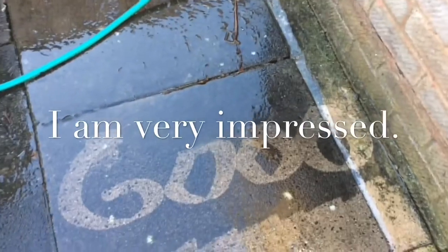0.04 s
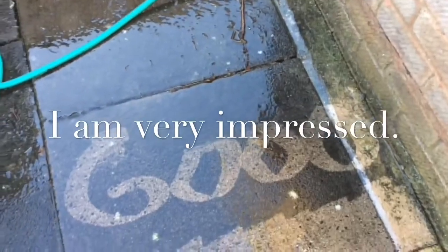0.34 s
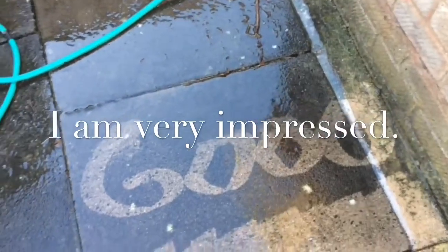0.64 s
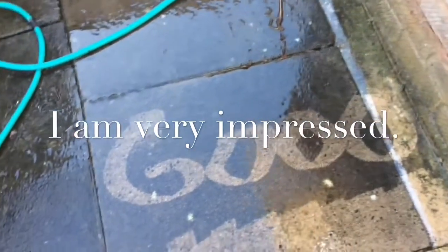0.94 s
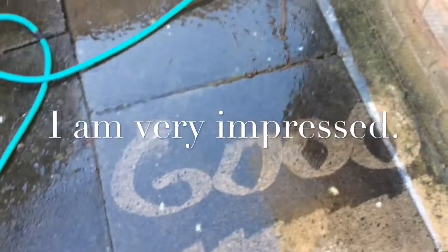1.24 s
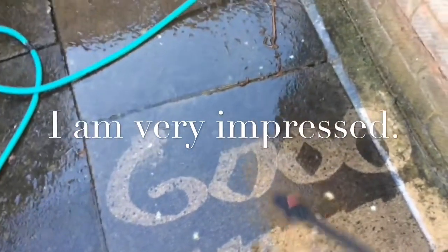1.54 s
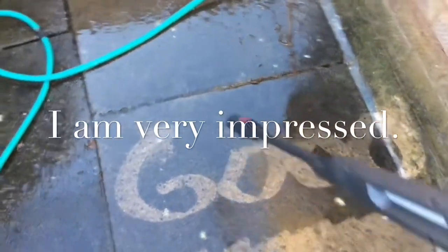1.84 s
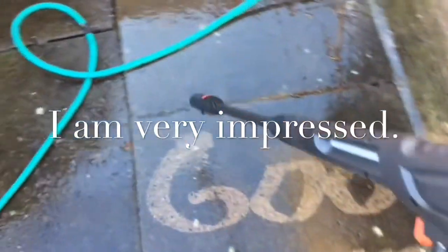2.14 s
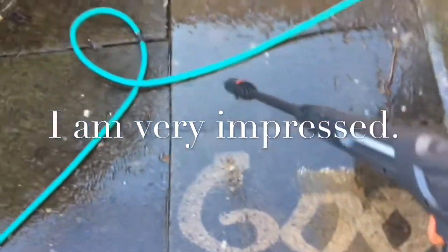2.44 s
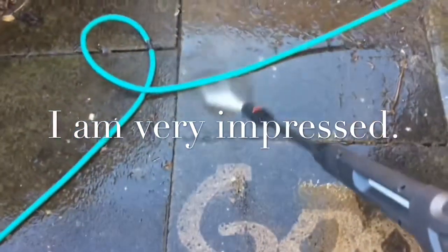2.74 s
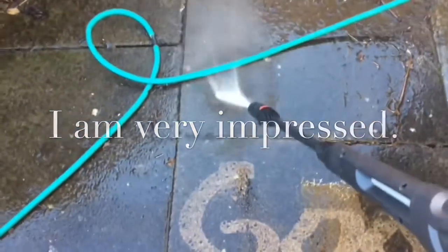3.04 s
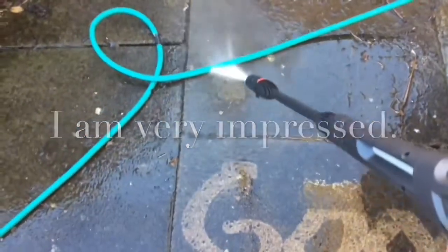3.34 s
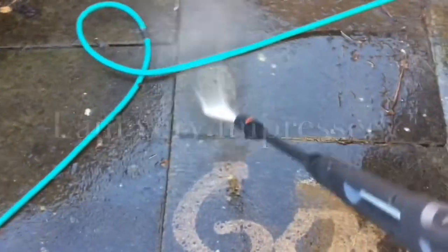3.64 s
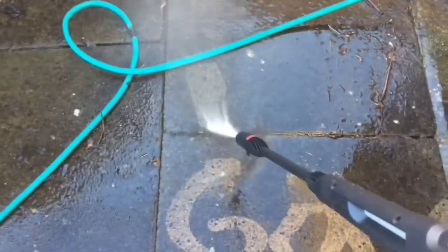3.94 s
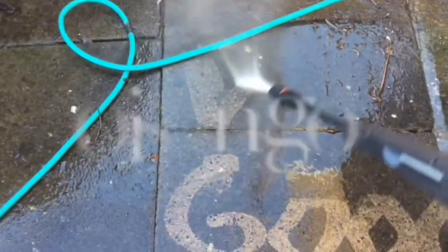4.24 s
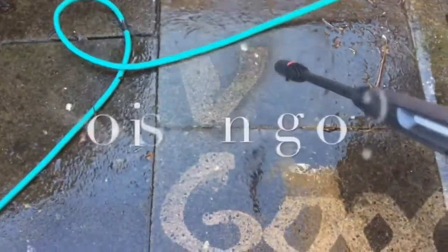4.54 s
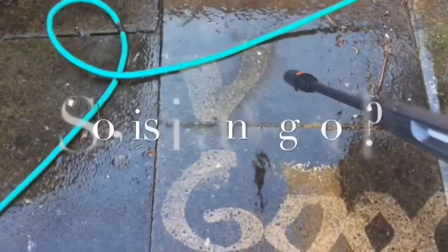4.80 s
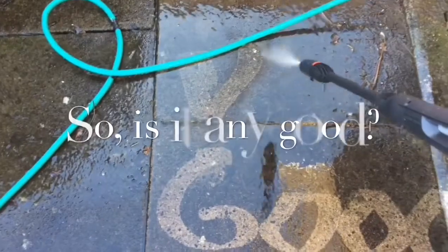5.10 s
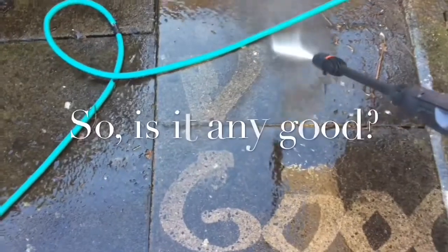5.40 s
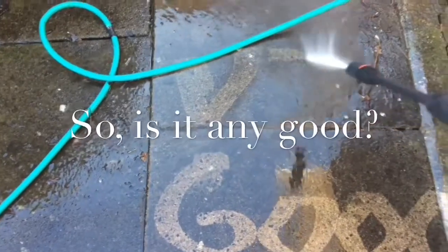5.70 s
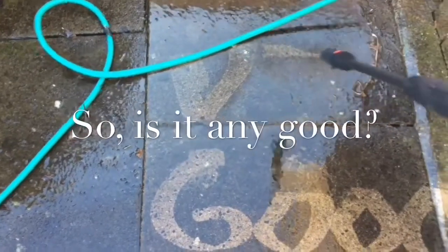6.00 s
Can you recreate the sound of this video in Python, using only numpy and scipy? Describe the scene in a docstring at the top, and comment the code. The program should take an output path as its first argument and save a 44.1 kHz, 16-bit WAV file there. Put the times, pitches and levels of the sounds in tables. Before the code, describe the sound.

Outdoors, an electric pressure washer rests with a faint hiss, thin whistles and small plastic clicks, one of them a sharp knock. The trigger is squeezed and a loud, bright jet hisses on wet paving for about two seconds over a quieter pump hum. It stops with a click and a soft jolt, then a second, shorter burst follows. The microphone is beside the spray tube, with faint trickling water behind.

```python
"""A faint hiss, thin whistles and clicks, then two loud bursts of spray: an electric pressure washer
cleans wet paving outdoors, heard in mono from beside the lance (the spray tube). At rest, water seeps
through the gun, which clicks as it is handled. Each squeeze of the trigger spits out stored pressure,
the pump spins up and the jet hisses on the slabs. On release the pump labours until its unloader
(relief valve) trips with a jolt. Behind it all are trickling water, soft rustling and outdoor air."""
import sys
import numpy as np
from scipy.fft import rfft, irfft, next_fast_len
from scipy.io import wavfile
from scipy.ndimage import map_coordinates

SR = 44100
rng = np.random.default_rng(int(sys.argv[2]) if len(sys.argv) > 2 else 0)


def wav_out(sig):
    """Save sig, one row per channel (or a flat mono array), as 16-bit PCM at SR to the path in sys.argv[1]."""
    wavfile.write(sys.argv[1], SR, np.round(np.clip(np.atleast_2d(sig).T, -1, 1) * 32767).astype(np.int16))


N = 267246
TIME = np.arange(N) / SR

# squeezes of the trigger: (opens [s], closes [s], leak before opening [s], time to open [s],
# first spit [dB], pump level [dB], nozzle pitch [Hz])
SQUEEZES = [(2.626, 4.503, 0.029, 0.021, -11.5, -39, 5832), (5.192, 5.901, 0.014, 0.011, -9.5, -37, 6300)]
# the lance sweeping over the slabs, one table a squeeze: (time [s], spray level [dB], roar [dB],
# mist [dB]); for roar and mist only the distance from the column's average counts
SWEEPS = [
    [(2.8, -13, -22.5, -12), (2.936, -13, -17.5, -11.5), (3.086, -14, -20.5, -8), (3.288, -13, -16.5, -11),
     (3.524, -13, -16, -10.5), (3.768, -14, -25, -7.5), (4.07, -15.5, -21.5, -7.5), (4.16, -14, -23.5, -7),
     (4.49, -14, -19, -10.5)],
    [(5.38, -13, -23, -12.5), (5.832, -12.5, -23, -11.5), (5.86, -12.5, -26.5, -11)],
]
# tone of the rattling pump casing: (frequency [Hz], level [dB])
CASING = [(40, -21), (110, -4.5), (200, -1.5), (400, -4), (620, 0), (1000, -8), (1250, -13.5), (1700, -5.5),
          (2200, -11.5), (3400, -18.5), (8000, -14), (15000, -32)]

# a "t60" is the time a sound takes to fade by 60 dB
SHUT_T60_S = 0.079  # the spray dies as the trigger valve shuts
STROKE_HZ, SPIN_UP_S = 48.47, .175  # the pump's steady stroke rate; its time to get going
UNLOAD_S, FREE_S = .124, .045  # after release the pump labours, then runs free


def jet():
    """The sheet of water tears into drops at the nozzle; they hiss in the air and drum on the slab."""
    # tones of the spray and of the struck slab: (frequency [Hz], level [dB])
    hiss_tone = [(100, -63), (500, -31), (1000, -23), (1220, -22), (1480, -15), (1950, -23), (3300, -19),
                 (4800, -13.5), (5400, -7.5), (5750, -2), (6500, -2), (7150, -6), (7550, -2), (7900, -1),
                 (8500, -5.5), (11500, -15), (15300, -19.5)]
    slab_tone = [(40, -20), (130, -19), (290, -3.5), (370, -2.5), (470, 7.5), (590, -5.5), (700, -3.5),
                 (860, 2.5), (1180, -7), (1420, 4), (1900, -8), (3200, -6.5), (6000, -4), (15000, -44)]
    full_db = sweep(column=1)
    flow = outflow(full_db) * amp(0.64 * wobble(14))
    tearing = amp(0.77 * wobble(600))
    hiss = coloured(tearing * white() + amp(-12.5) * drops(rate=3200, spread_db=8.5), hiss_tone)
    nozzle_hz = latest([row[-1] for row in SQUEEZES]) * (1 + .012 * wobble(20))
    ring_db = -10.5 + 1.3 * swing(column=1) + 2.3 * wobble(18)  # stands out where the hiss is strong
    nozzle_ring = amp(ring_db) * noise_band(nozzle_hz, width_hz=520)
    mist = coloured(tearing * white(), [(5000, -41), (9000, 7.5), (13500, 6), (15500, -3.5)])
    mist *= amp(-14 + 2.3 * swing(column=3))
    roar = coloured(white() + amp(2.5) * drops(rate=900, spread_db=8.0), slab_tone)
    roar *= amp(full_db - 22.5 + 1.83 * swing(column=2) + wobble(25.14))  # the splash is uneven
    landing = sum(held(opens, closes, attack=0.028, t60=SHUT_T60_S) for opens, closes, *_ in SQUEEZES)
    direct = flow * (amp(-0.62) * hiss + nozzle_ring + mist) + landing * roar
    # sound bounces off the paving; its delay drifts as the lance sweeps
    delay_s = .0032 * (1 + 0.0594 * wobble(2.5))
    return direct + 0.23 * np.interp(TIME - delay_s, TIME, direct)


def outflow(full_db):
    """Strength of the jet: a leak, a spit of stored pressure, the pump's build-up, a last dribble."""
    spit_hold_s, drain_db_per_s, build_db_per_s, rise_s = 0.0044, 180, 161, 0.0059
    flow = np.zeros(N)
    for opens, closes, leak_s, travel_s, spit_db, *_ in SQUEEZES:
        valve = np.minimum(since(opens) / travel_s, 1) * amp(-60 * since(closes) / SHUT_T60_S)
        stored = amp(spit_db - drain_db_per_s * since(opens + travel_s + spit_hold_s))
        pumped = amp(full_db - build_db_per_s * np.maximum(opens + SPIN_UP_S - TIME, 0))
        leak = amp(-33.5) * held(opens - leak_s, opens, rise_s, SHUT_T60_S)
        dribble = amp(-43) * strike(closes, rise_s, t60=1)
        flow += valve * np.hypot(stored, pumped) + leak + dribble
    return flow


def pump():
    """Pistons and gears hum in step with the shaft; the casing rattles with each stroke."""
    # overtones of the hum, the 13th from the gears: (multiple of the stroke rate, level [dB])
    overtones = [(3, -9), (4, -10.5), (5, -5), (6, -4.5), (8, -3), (9, -7), (10, -7), (11, -16), (12, -4),
                 (13, 3.5), (14, -6), (15, -3), (16, -7), (17, -8), (21, -5), (23, -12), (24, -13),
                 (36, -13)]
    strain_db, strain_s = 5.5, 0.47  # the pump is louder at first
    speed = latest([stroke_rate(opens, closes) for opens, closes, *_ in SQUEEZES])
    effort = np.zeros(N)
    for opens, closes, *_, pump_db, _ in SQUEEZES:
        working = held(opens + SPIN_UP_S / 2, closes + UNLOAD_S + FREE_S, attack=0.098, t60=0.1)
        effort += amp(pump_db + strain_db * np.exp(-since(opens) / strain_s)) * working
    unsteady = 1 + .0007 * wobble(16)
    phase = 2 * np.pi * np.cumsum(speed * unsteady) / SR
    hum = unit(sum(amp(db + 1.5 * wobble(9)) * np.sin(k * phase + 2 * np.pi * rng.random())
                   for k, db in overtones))
    rattle = coloured(white() * amp(2.5 * np.cos(phase) + 1.1 * np.cos(3 * phase)), CASING)
    speed_gain = np.minimum(speed / STROKE_HZ, 1) ** 10.2  # much quieter below full speed
    return effort * speed_gain * (amp(-2.0) * hum + amp(-5.0) * rattle)


def stroke_rate(opens, closes):
    """Pump speed in Hz: it spins up, slows against the closed gun, is freed by the unloader, coasts."""
    start_share, surge_hz, surge_s = .4, 3.5, .13  # starts at part speed, overshoots under light load
    sag_hz_per_s, free_hz, coast_hz_per_s = 13, 50.5, 140
    to_go = np.maximum(1 - since(opens) / SPIN_UP_S, 0)
    spin_up = 1 - (1 - start_share) * to_go ** 2
    running = (STROKE_HZ + surge_hz * np.exp(-since(opens) / surge_s)) * spin_up
    coasting = np.maximum(free_hz - coast_hz_per_s * since(closes + UNLOAD_S + FREE_S), 0)
    return np.where(TIME < closes + UNLOAD_S, running - sag_hz_per_s * since(closes), coasting)


def jolts():
    """The motor starting and the unloader slamming shake the casing and set its big panels booming."""
    # jolts at each motor start: (delay [s], level [dB], boom above that level [dB], t60 [s])
    start_jolts = [(.03, -44, 2.5, 0.43), (.122, -41, 2, 0.69), (.222, -45, 7.5, .6)]
    # notes the panels ring at: (pitch [Hz], width [Hz], level [dB])
    panel_notes = [(165, 52, -4.5), (235, 47, -2), (288, 36, 2.5)]
    blows = []
    for opens, closes, *_, pump_db, _ in SQUEEZES:
        blows += [(opens + delay, db, boom_db, t60) for delay, db, boom_db, t60 in start_jolts]
        blows += [(closes + UNLOAD_S, pump_db - 1.5, 2.5, 0.38)]  # the unloader's slam
    shake = sum(amp(db) * strike(s, attack=0.0054, t60=t60) for s, db, _, t60 in blows)
    boom = sum(amp(db + boom_db) * strike(s, attack=0.01, t60=t60) for s, db, boom_db, t60 in blows)
    rumble = coloured(white(), [(60, -20), (150, -7.5), (320, -8), (900, -20)])
    return shake * coloured(white(), CASING) + boom * resonant(rumble, panel_notes)


def clicks():
    """Each click knocks the gun's plastic shell and snaps brightly; the yard adds a short faint tail."""
    # clicks of the gun and hose: (time [s], knock [dB], snap [dB], t60 [s])
    hits = [(.379, -50.5, -48, 0.12), (.539, -54, -55, .04), (0.665, -57.5, -58, .04),
            (0.7458, -33.5, -41, 0.067), (0.753, -23, -32.5, 0.041), (0.874, -56, -60, 0.05),
            (1.176, -62, -53, .05), (1.461, -46.5, -45, 0.061), (1.645, -51, -53, 0.035),
            (1.756, -49, -42.5, .035), (1.976, -48, -54, .04), (2.114, -45, -39, 0.024),
            (2.169, -46, -40, 0.024), (2.208, -57, -47, .04), (2.358, -49.5, -61, 0.09),
            (4.626, -27, -23, 0.027), (4.642, -64, -38, 0.13), (4.965, -60, -42, 0.11),
            (6.031, -41, -37.5, .2)]
    # notes the shell rings at: (pitch [Hz], width [Hz], level [dB])
    shell_notes = [(255, 87, 0.5), (936, 48, 2), (1105, 98, 2), (1560, 170, 3.5), (2004, 110, 3),
                   (2530, 120, 1.5), (3240, 470, -6.5)]
    # tone of the snap: (frequency [Hz], level [dB])
    snap_tone = [(1000, -19), (3000, -15), (4500, -3.5), (5900, 2), (7000, 1), (7900, 4.5), (9000, -7.5),
                 (15000, -29)]
    knock, snap = np.zeros(N), np.zeros(N)
    for s, knock_db, snap_db, t60 in hits:
        fade = strike(s, attack=0.00016, t60=t60) + amp(-23) * strike(s, attack=.005, t60=0.21)
        knock += amp(knock_db) * fade
        snap += amp(snap_db) * fade
    return knock * resonant(white(), shell_notes) + snap * coloured(white(), snap_tone)


def taps_and_groan():
    """Short hollow taps, and a low groan of the hose after the first release; each is one fading note."""
    # the taps, then the groan in the last row: (time [s], pitch [Hz], level [dB], t60 [s])
    notes = [(0.379, 1800, -40, 0.054), (.747, 192, -35, .07), (0.7534, 1680, -12, 0.021),
             (1.023, 3580, -55, 0.045), (1.552, 1600, -47, .06), (2.358, 1520, -41, .07),
             (2.363, 1710, -46, 0.084), (2.504, 1820, -40, .06), (4.66, 176, -43.5, 0.4)]
    return sum(amp(db) * strike(s, attack=0.00025, t60=t60) * np.sin(2 * np.pi * hz * (TIME - s))
               for s, hz, db, t60 in notes)


def seep_and_scuff():
    """Water forced through the closed gun makes a thin hiss that swells; there is one brief scuff too."""
    # swells of thin hiss, and the scuff near 4.95 s: (start [s], end [s], first level [dB], rise [dB/s])
    swell_rows = [(.3, 0.768, -59, 5), (1.11, 1.99, -55.5, 5.5), (1.75, 1.96, -56, 0),
                  (2.194, 2.556, -56, 28), (4.92, 4.977, -48.5, 0), (5.04, 5.19, -57, 5)]
    # tone of the thin hiss: (frequency [Hz], level [dB])
    hiss_tone = [(1500, -32), (2500, -15), (3200, -5.5), (4300, -10), (5100, 0), (5850, 6.5), (6750, -4.5),
                 (7850, 4), (8750, -6), (9800, 0), (10600, -7.5), (12500, -10), (15000, -16)]
    swells = np.zeros(N)
    for start, end, db, rise in swell_rows:
        rise_db = rise * np.minimum(since(start), end - start)
        swells += amp(db + rise_db) * held(start, end, attack=0.019, t60=0.21)
    level = np.hypot(amp(-64), swells) * amp(0.58 * wobble(27.17))
    return level * coloured(white() * amp(0.83 * wobble(330)), hiss_tone)


def whistles():
    """The seals whistle under pressure; swirling flow makes each note breathy and its pitch waver."""
    # whistles: (start [s], end [s], first pitch [Hz], last pitch [Hz], level [dB], width [Hz])
    notes = [(.04, 0.2, 1700, 1496, -65, 100), (.05, 0.53, 1170, 1200, -68, 71),
             (.04, 0.71, 1920, 1820, -64.5, 120), (0.11, 0.64, 2550, 2300, -69.5, 160),
             (.05, .55, 2950, 3430, -67.5, 260), (.25, 0.73, 1660, 1600, -63, 180),
             (1.1, 1.65, 2300, 2400, -70, 95), (1.1, 1.65, 1200, 1160, -67.5, 90),
             (1.1, 1.9, 10400, 13700, -68.5, 1600), (2.0, 2.55, 2390, 2330, -69, 170),
             (2.05, 2.55, 1182, 1150, -68.5, 130), (1.05, 2.55, 1600, 1680, -66.5, 400),
             (2.24, 2.39, 4950, 6250, -56.5, 110), (2.31, 2.53, 5200, 6350, -54.5, 116),
             (2.606, 2.619, 6800, 6270, -29.5, 740)]
    sound = np.zeros(N)
    for start, end, from_hz, to_hz, db, width_hz in notes:
        length = end - start
        glide = np.minimum(since(start) / length, 1) ** .8  # slows as it goes
        pitch = (from_hz + (to_hz - from_hz) * glide) * (1 + .006 * wobble(23))
        level = amp(db) * held(start, end, attack=0.073 * length, t60=length)
        sound += level * noise_band(pitch, width_hz)
    return sound


def trickle_and_rustle():
    """Water trickles steadily off the slabs; handling the lance adds swells of soft, low rustling."""
    # swells of rustling: (start [s], end [s], level [dB])
    rustle_rows = [(1.066, 1.95, -57.5), (2.407, 4.684, -55)]
    # tone of both trickle and rustle: (frequency [Hz], level [dB])
    tone = [(30, -11), (90, -6), (150, -4.5), (400, -0.5), (580, -2), (780, -2), (1000, -7), (1200, -9),
            (1350, -1.5), (1600, -1), (2100, -8), (2400, -13), (2800, -11), (5000, -5), (15000, -38)]
    rustle = sum(amp(db) * held(start, end, attack=0.079, t60=1) for start, end, db in rustle_rows)
    level = np.hypot(amp(-65.5), rustle) * amp(wobble(22.34))
    return level * coloured(white() + amp(-3.0) * drops(rate=250, spread_db=6), tone)


def air():
    """Quiet outdoor air, with soft, low puffs blowing on the microphone."""
    # tone of the yard's background noise: (frequency [Hz], level [dB])
    yard_tone = [(20, -24), (45, 7), (100, 2.5), (250, -1.5), (520, -14), (1000, -6.5), (1650, -5),
                 (2250, -14), (3100, -11), (4500, -46), (5800, -20), (6700, -3.5), (7850, 2.5), (8700, -3),
                 (11000, -11), (15000, -26)]
    # puffs of air: (time [s], level [dB], half-length [s])
    puff_rows = [(1.035, -53.5, 0.02), (1.156, -55, 0.014), (1.823, -57, .05), (3.452, -59, 0.16),
                 (3.882, -49.5, 0.11), (4.085, -40.5, 0.049), (4.219, -32, 0.012), (4.44, -47.5, 0.044),
                 (5.3, -56, 0.082)]
    puffs = sum(amp(db) * np.exp(-.5 * ((TIME - s) / width) ** 2) for s, db, width in puff_rows)
    rumble = coloured(white(), [(25, -39), (55, -5.5), (120, -8.5), (250, -15), (900, -40), (4000, -106)])
    return amp(-59) * coloured(white(), yard_tone) + puffs * rumble


def latest(values):
    """At each moment, the value that belongs to the most recent squeeze."""
    return np.select([TIME >= row[0] for row in SQUEEZES][::-1], values[::-1], values[0])


def sweep(column):
    """One column of the lance's sweeps, its points joined by straight lines."""
    tables = [np.transpose(rows) for rows in SWEEPS]
    return latest([np.interp(TIME, table[0], table[column]) for table in tables])


def swing(column):
    """How far a column of the sweeps lies from its average, in dB."""
    return sweep(column) - np.mean([row[column] for rows in SWEEPS for row in rows])


def amp(db):
    """Turn decibels into a multiplier."""
    return 10 ** (np.asarray(db) / 20)


def unit(x):
    """Scale to an average strength (rms) of 1."""
    return x / np.sqrt(np.mean(x ** 2) + 1e-20)


def since(s):
    """Seconds gone by since time s, zero before it."""
    return np.maximum(TIME - s, 0)


def held(start, end, attack, t60):
    """A level that rises at start, holds until end and dies away; all in seconds."""
    return (1 - np.exp(-since(start) / attack)) * np.exp(-np.log(1000) * since(end) / t60)


def strike(s, attack, t60):
    """The rise and fade of a blow at time s."""
    return held(s, s, attack, t60)


def white():
    """Fresh white noise."""
    return rng.standard_normal(N)


def wobble(rate):
    """A smooth random curve through rate points a second."""
    return map_coordinates(rng.standard_normal(int(N * rate / SR) + 4), [TIME * rate])


def drops(rate, spread_db):
    """Tiny random impacts of uneven size, about rate a second."""
    impacts = (rng.random(N) < rate / SR) * np.sign(white())
    return unit(impacts * amp(spread_db * rng.uniform(-1.2, 1, N)))


def noise_band(hz, width_hz):
    """A narrow band of noise that follows a pitch."""
    phase = 2 * np.pi * np.cumsum(hz) / SR
    position = np.arange(1, N + 1) * width_hz / SR
    flutter = lambda: map_coordinates(rng.standard_normal(SR), [position], order=2, mode="wrap")
    return unit(flutter() * np.sin(phase) + flutter() * np.cos(phase))


def filtered(x, response):
    """Multiply each frequency in x by response(frequency)."""
    size = next_fast_len(N + SR // 2)
    return irfft(rfft(x, size) * response(np.fft.rfftfreq(size, 1 / SR)), size)[..., :N]


def coloured(x, points):
    """Shape the tone of x by (frequency [Hz], level [dB]) points, at strength 1."""
    f, db = np.transpose(points)
    return unit(filtered(x, lambda hz: amp(np.interp(np.log(hz + 1), np.log(f), db))))


def resonant(x, notes):
    """Make x ring at (pitch [Hz], width [Hz], level [dB]) notes, at strength 1."""
    def body(f):
        return sum((-1) ** k * amp(db) * 1j * f * width / (hz * hz - f * f + 1j * f * width)
                   for k, (hz, width, db) in enumerate(notes))
    return unit(filtered(x, body))


def scene():
    """All sources added up, the same in both channels."""
    washer = jet() + pump() + jolts() + clicks() + taps_and_groan() + seep_and_scuff() + whistles()
    mono = washer + trickle_and_rustle() + air()
    return np.array([mono, mono])


def record(dry):
    """Round off the highest peaks and cut the very top of the treble."""
    ceiling, top_hz = .92, 15330
    rounded = dry / (1 + np.abs(dry / ceiling) ** 8) ** (1 / 8)
    return filtered(rounded, lambda hz: .5 - .5 * np.tanh((hz - top_hz) / 50))


dry = scene()
out = record(dry)
wav_out(out)
```